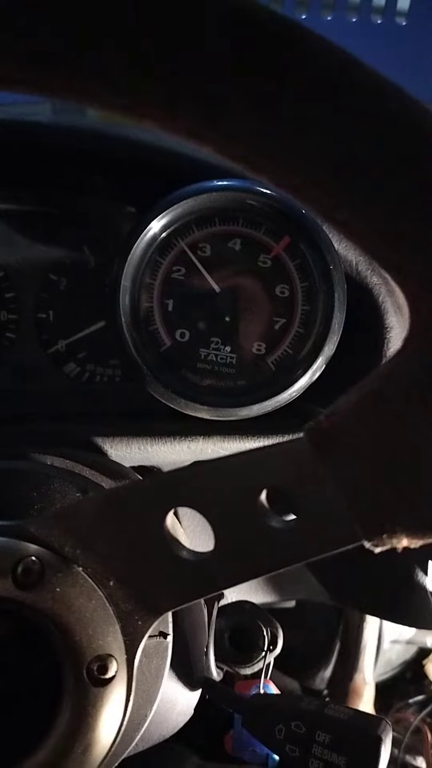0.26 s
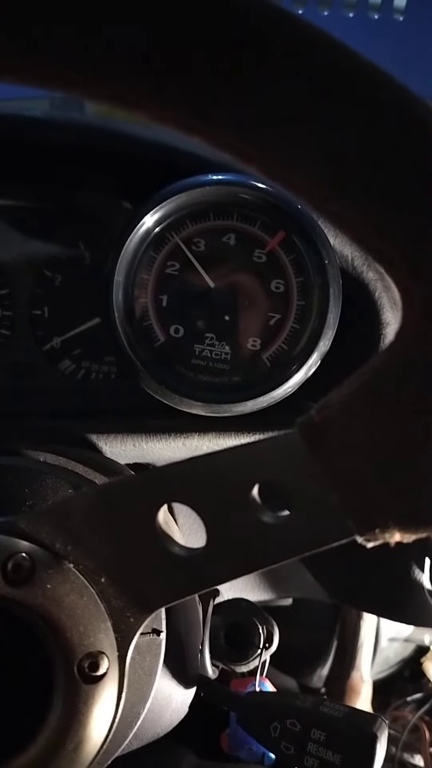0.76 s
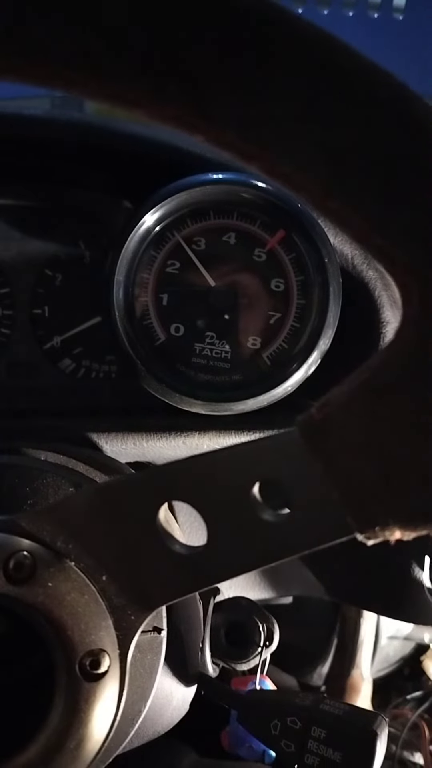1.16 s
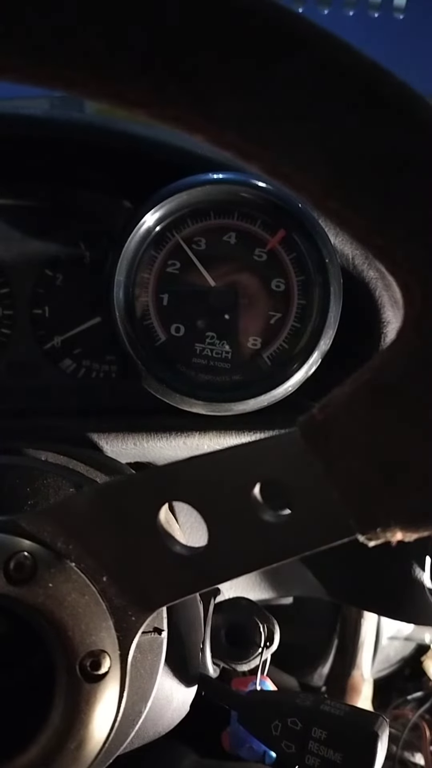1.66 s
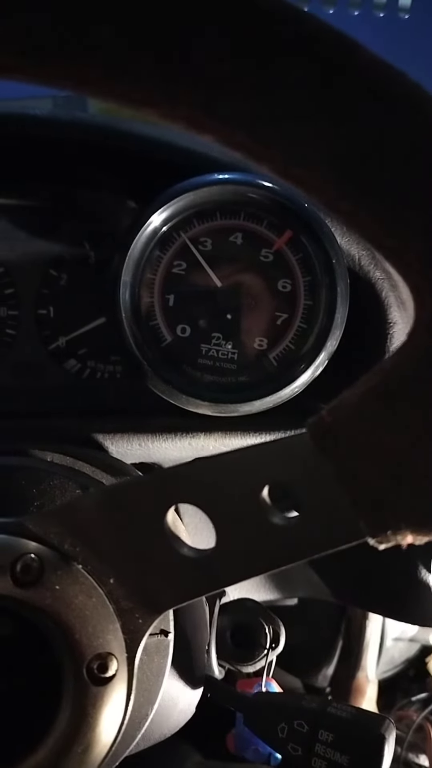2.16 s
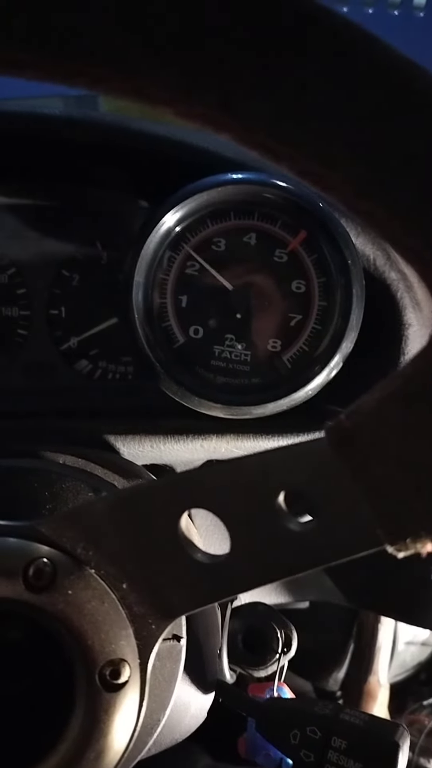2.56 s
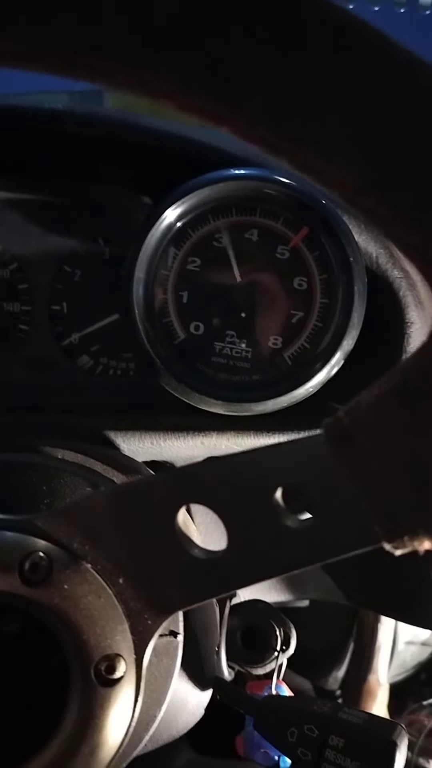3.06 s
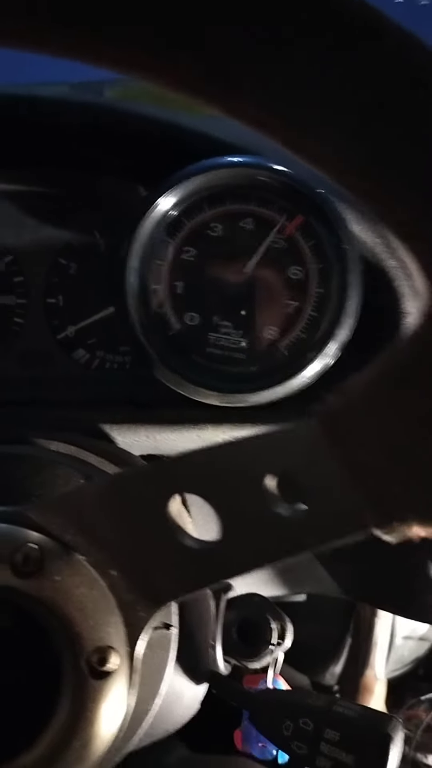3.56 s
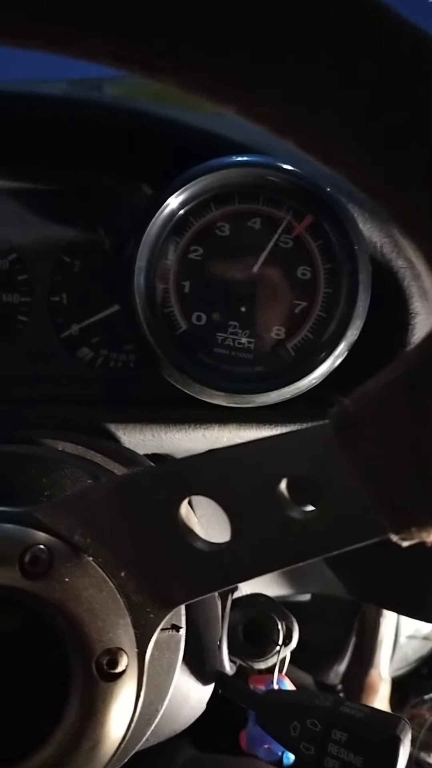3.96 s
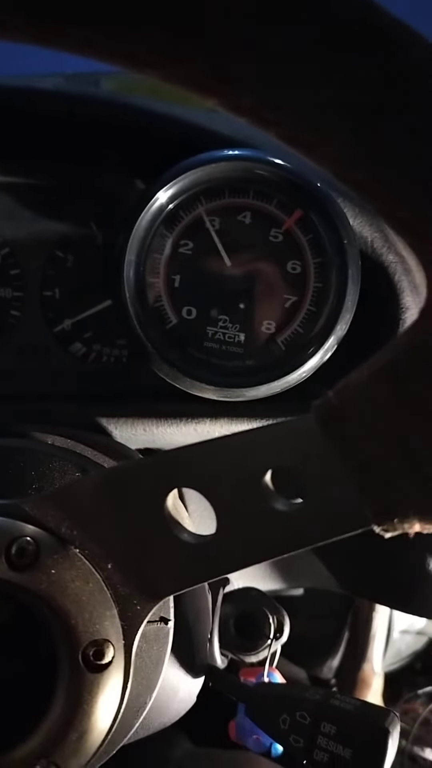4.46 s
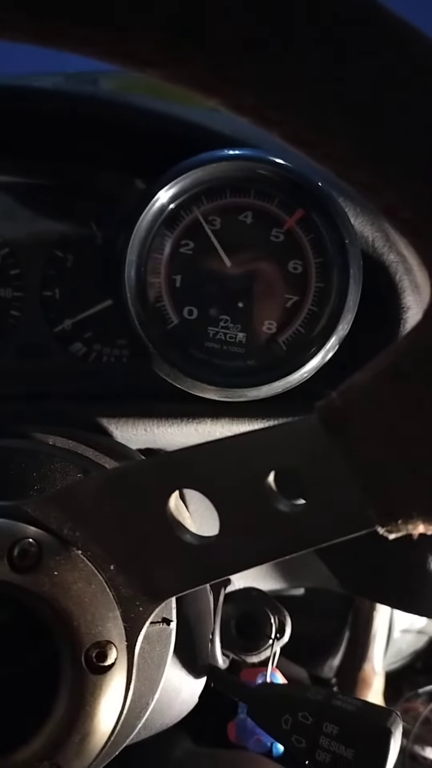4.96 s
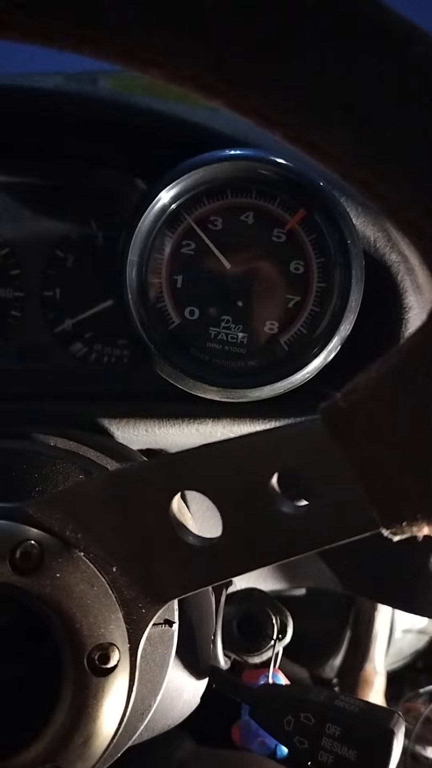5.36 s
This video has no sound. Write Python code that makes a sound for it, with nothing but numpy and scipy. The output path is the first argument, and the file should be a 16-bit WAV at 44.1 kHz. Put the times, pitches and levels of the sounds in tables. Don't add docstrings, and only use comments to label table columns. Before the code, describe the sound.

A lumpy V8 idle fills a car cabin: strong and weak exhaust thumps alternate irregularly over soft mechanical clatter and a barely audible pump whine. After almost three seconds a short double rev swells in pitch and loudness with rushing intake air, peaking near three and a half seconds. The pedal lifts and the sound collapses to a subdued, ragged burble winding down. Close interior perspective, centred bass, wider noise.

```python
import sys
import numpy as np
from scipy import signal
from scipy.fft import rfft, irfft, next_fast_len
from scipy.io import wavfile
from scipy.ndimage import uniform_filter1d

SR = 44100
rng = np.random.default_rng(int(sys.argv[2]) if len(sys.argv) > 2 else 0)


def digitize_waveform(pressure):
    field = np.atleast_2d(pressure).T
    bounded = np.clip(field, -1, 1)
    quanta = np.round(bounded * 32767).astype(np.int16)
    wavfile.write(sys.argv[1], SR, quanta)


def boost(x):
    u = np.asarray(x, float) / 20
    return 10 ** u


N = 247401
T = np.arange(N) / SR

# (time [s], four-stroke cycle rate [Hz])
SPEED_HZ = [(0, 6.99), (.38, 6.775), (.98, 6.985), (1.68, 6.94), (1.86, 7.11), (2.2, 6.89), (2.56, 7.25),
            (2.8, 7.02), (2.88, 7.4), (3.02, 13), (3.22, 20), (3.39, 31.3), (3.46, 30.7), (3.88, 20.4),
            (4.2, 14.7), (4.55, 11.2), (5, 8.86), (5.61, 7.78)]
# (time [s], starvation [0-1])
STARVATION = [(3.62, 0.15), (3.82, 0.66), (4.02, 0.89), (4.4, 1), (4.74, 1), (5.34, 0.71), (5.61, 0.7)]
# (time [s], share [0-1])
PATTERN_SHARE = [(2.8, 1), (3, .77), (3.65, .8), (4.15, .47), (5.1, .47), (5.61, .3)]


def evened(x):
    return x / np.sqrt(np.mean(x ** 2) + 1e-20)


def read(points, hz):
    f, value = np.transpose(points)
    return np.interp(np.log(hz + 1), np.log(f + 1), value)


def curve(table):
    return np.interp(T, *np.transpose(table))


def wander(hz):
    knots_s = np.arange(0, T[-1] + 1, 1 / hz)
    return evened(np.interp(T, knots_s, rng.standard_normal(len(knots_s))))


def off_idle():
    return np.clip(4.4 * (1 - curve(PATTERN_SHARE)), 0, 1)


def level_db(law, lead_s=0):
    # (start [s], rise [s], held [s], fall [s], opening [0-1])
    stabs = [
        (2.858, 0.11, 0.14, 0.07, 0.96),
        (3.212, 0.067, .1, 0.056, 0.86),
        (3.39, 0.035, 0.092, .15, 0.27),
    ]
    idle_db, throttle_db, octave_db, starved_db, starved_power = law
    t = T[::64] + lead_s
    pedal = sum(opening * np.interp(t, np.cumsum(times), [0, 1, 1, 0]) for *times, opening in stabs)
    octaves = np.log2(np.interp(t, *np.transpose(SPEED_HZ)) / 7)
    starved = np.clip(np.interp(t, *np.transpose(STARVATION)), 0, 2)
    db = idle_db + throttle_db * pedal + octave_db * octaves + starved_db * starved ** starved_power
    return np.interp(T, T[::64], db)


def exhaust(cycles):
    # (bank [1 or 0], strength at idle [dB])
    cylinders = [(1, 1.3), (0, 5.9), (0, 3.3), (1, -7.1), (0, -10.5), (1, 2.2), (1, -1.0), (0, -0.2)]
    # (frequency [Hz], width [Hz], bank 1 share [signed], bank 0 share [signed])
    pipe_modes = [(41.4, 16.9, 0.105, -0.213), (53.4, 13.0, -0.042, 0.262), (77.8, 34.1, -1.0, -0.059),
                  (84.6, 13.0, 0.963, -0.043), (100.6, 13.0, 0.814, -0.528), (103.4, 13.0, -0.016, 0.443),
                  (133.3, 13.0, 0.126, -0.273), (149.4, 13.0, 0.848, 0.511), (160.6, 18.5, -0.782, -0.001),
                  (165.9, 13.0, 0.454, -0.129), (213.2, 13.0, 0.559, 0.646), (213.0, 16.5, -0.47, -0.557),
                  (243.1, 45.0, 0.043, 0.017)]
    # (frequency [Hz], level [dB])
    seat_colour = [(30, 0), (45, 4), (60, 1), (110, 0), (150, 3), (190, .5), (250, 0), (320, -5),
                   (500, -20)]
    # (idle [dB], full throttle [dB], per speed doubling [dB], starved [dB], starvation exponent [-])
    law = (-14, 6, -2, -15.5, 1.45)

    first_firing_cycles = 0.947
    eighths = np.floor(8 * (cycles - first_firing_cycles) + 8).astype(int)
    at = np.flatnonzero(np.diff(eighths)) + 1
    bank, strength_db = np.array(cylinders)[eighths[at] % 8].T
    chance_db = 1.5 + 1.8 * curve(STARVATION)[at] ** 4
    strength_db = curve(PATTERN_SHARE)[at] * strength_db + chance_db * rng.standard_normal(len(at))

    size = next_fast_len(N + SR)
    pulses = np.zeros((2, N))
    pulses[(1 - bank).astype(int), at] = boost(strength_db) / curve(SPEED_HZ)[at]
    first = pulses[:, :np.searchsorted(cycles, 1)]
    pulses = np.hstack([pulses, np.zeros((2, size - N - first.shape[1])), first])

    hz = np.fft.rfftfreq(size, 1 / SR)
    f, width, *shares = np.transpose(pipe_modes)[:, :, None]
    paths = [(share / (1 + 2j * (hz - f) / width)).sum(0) for share in shares]
    low_cut = (1j * hz / 45 / (1 + 1j * hz / 45)) ** 3
    spectrum = (rfft(pulses, size) * paths).sum(0)
    sound = irfft(spectrum * low_cut * boost(read(seat_colour, hz)), size)[:N]

    idle, moving = (uniform_filter1d(uniform_filter1d(sound ** 2, size=n), size=n)
                    for n in (SR // 4, SR // 12))
    slow_power = abs(idle + off_idle() * (moving - idle))
    return boost(level_db(law, lead_s=0.038)) * sound / np.sqrt(slow_power + 1e-20)


def surge(cycles):
    shake_laws = {3: (-28, 10.5, 4, 10, 2.1), 4: (-27, 8, -9.5, 3, 4), 5: (-15, 4.5, 3, -15.5, 1),
                  6: (-27.5, -11, 1, -5.5, 2.1), 7: (-24, -15, 1.8, -17, 9.5), 8: (-14, 2, -2.5, -13, 3.5),
                  10: (-28.5, 7.5, 3.5, -12, 5.5), 13: (-20, -3, -5, -12.5, 6),
                  19: (-15.5, 1.1, -8.5, -18, 2)}
    # (frequency [Hz], width [Hz])
    shell_modes = [(72, 36), (148, 28.3), (212, 20.4)]
    stiff_hz = 36
    out = np.zeros(N)
    for order, law in shake_laws.items():
        beat_hz = order * curve(SPEED_HZ)
        ring = sum(1 / (1 + (2 * (beat_hz - hz) / width) ** 2) for hz, width in shell_modes)
        ring = ring / (1 + (stiff_hz / beat_hz) ** 8)
        out += boost(level_db(law, lead_s=0.038)) * ring * np.sin(2 * np.pi * order * cycles)
    return out * off_idle()


def cabin_noise(colour, ripple_db, panel_db):
    # (frequency [Hz], width [Hz])
    panels = [(315, 29), (457, 4.6), (617, 37), (666, 15), (724, 15), (771, 8.7), (947, 20), (1041, 33),
              (1174, 13), (1668, 6), (1738, 12), (1926, 59), (2126, 20), (2440, 43), (2928, 5.3),
              (3600, 59)]
    # (frequency [Hz], likeness [0-1])
    likeness = [(60, 0.47), (200, 0.5), (350, 0.84), (640, 0.85), (1000, .45), (2000, .3), (15000, 0.25)]
    # (frequency [Hz], level [dB])
    lean_db = [(150, -1), (350, 2.5), (700, -3), (1400, -3), (2800, -1.6), (5600, 3.5), (9000, 4.5),
               (14000, -4)]

    hz = np.fft.rfftfreq(N, 1 / SR)
    a, b = rfft(rng.standard_normal((2, N)))
    same = np.clip(read(likeness, hz), -1, 1)
    wide = np.clip((hz - 500) / 600, 0, 1)
    left, right, both = (np.interp(hz, np.arange(1000) * 27.0, r) for r in rng.standard_normal((3, 1000)))
    ripple = np.sqrt(1 - 0.52 * wide) * both + np.sqrt(0.52 * wide) * np.array([left, right])
    turn = np.exp(1j * wide * np.interp(hz, np.arange(100) * 230, rng.uniform(-4, 4, 100)))
    peaks = np.max([1 / (1 + (2 * (hz - f) / width) ** 2) for f, width in panels], 0)
    db = read(colour, hz) + ripple_db * ripple + panel_db * peaks
    db = db + np.outer([0.5, -0.5], read(lean_db, hz))
    ports = np.array([a, same * turn * a + np.sqrt(1 - same ** 2) * b])
    return evened(irfft(ports * boost(db), N))


def roar(cycles):
    # (frequency [Hz], density [dB/Hz])
    rush_colour = [(110, -67), (180, 4.5), (272, -8), (420, -8.5), (507, -9.5), (584, -12), (740, -8.5),
                   (851, -9.5), (1020, -11), (1430, -15), (1690, -15), (3000, -23), (3900, -71),
                   (6600, -120)]
    # (idle [dB], full throttle [dB], per speed doubling [dB], starved [dB], starvation exponent [-])
    law = (-29, 7, 4, -15.5, 1.3)
    puffs_db = 1.7 * np.cos(2 * np.pi * (8 * cycles + 0.17)) + 0.5 * wander(30)
    rush = cabin_noise(rush_colour, ripple_db=1.5, panel_db=6)
    return boost(level_db(law) + puffs_db) * rush


def clatter(cycles):
    # (frequency [Hz], density [dB/Hz])
    rattle_colour = [(590, -30), (1000, -4), (1410, -6.5), (1680, 0), (1860, -10.5), (2180, -1), (2600, -2),
                     (3410, -7), (4440, -5), (6200, -7.5), (7360, -12.5), (8740, -25), (13500, -26),
                     (15500, -36)]
    # (idle [dB], full throttle [dB], per speed doubling [dB], starved [dB], starvation exponent [-])
    law = (-30.5, 11.5, 0.17, -22, 1.34)
    noise = cabin_noise(rattle_colour, ripple_db=2.2, panel_db=3.5)
    low, high = (signal.sosfilt(signal.butter(4, 3400, kind, fs=SR, output="sos"), noise)
                 for kind in ("low", "high"))
    low_db = 1.3 * np.cos(6 * np.pi * (cycles - 0.58)) + 0.9 * wander(14)
    high_db = 1.5 * np.cos(2 * np.pi * (cycles - 0.53)) + 0.8 * np.cos(4 * np.pi * (cycles - 0.5))
    high_db = high_db + 0.7 * wander(9)
    grain = boost(2.3 * uniform_filter1d(rng.exponential(1, N), size=40))
    return boost(level_db(law) + 4.0) * evened(grain * (low * boost(low_db) + high * boost(high_db)))


def whine():
    # (frequency [Hz], level [dB])
    tones = [(2729, -64), (2810, -72)]
    out = np.zeros(N)
    for hz, db in tones:
        level = boost(db + 4.0 + 4.0 * wander(21))
        out += level * np.sin(2 * np.pi * np.cumsum(hz + 4 * wander(5)) / SR)
    return out


def scene():
    cycles = np.cumsum(curve(SPEED_HZ)) / SR
    bass = (exhaust(cycles) + surge(cycles)) * boost(np.array([[0.1], [-0.1]]))
    pump = whine() * boost(np.array([[-1.2], [1.2]]))
    return bass + roar(cycles) + clatter(cycles) + pump


def top_cut(x):
    return signal.sosfilt(signal.butter(12, 15660, fs=SR, output="sos"), x)


def record(dry):
    knee = 0.4 * np.tanh(np.maximum(abs(dry) - 0.6, 0) / 0.4)
    mix = np.clip(dry, -0.6, 0.6) + np.sign(dry) * knee
    return top_cut(mix)


dry = scene()
out = record(dry)
digitize_waveform(out)
```